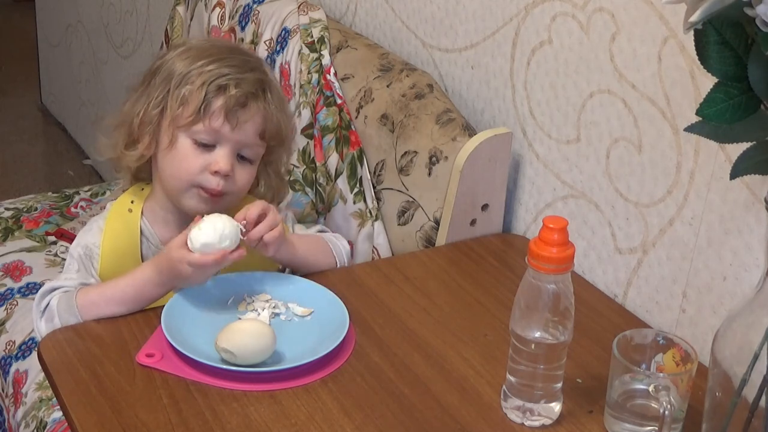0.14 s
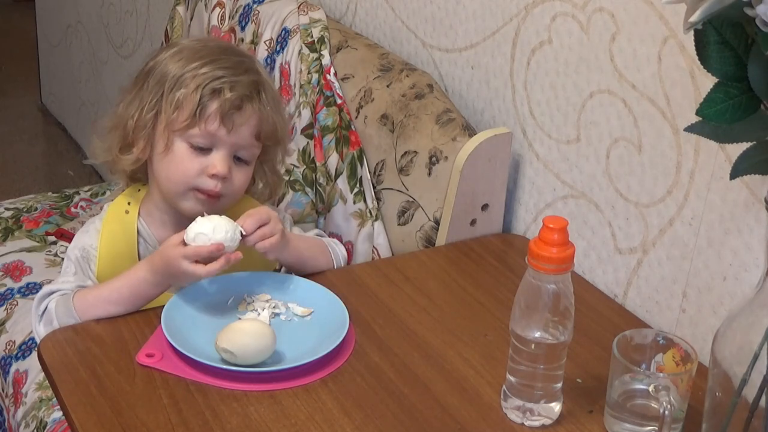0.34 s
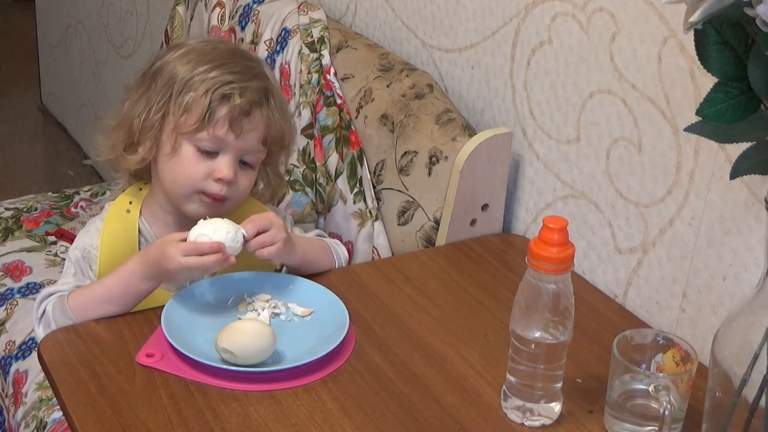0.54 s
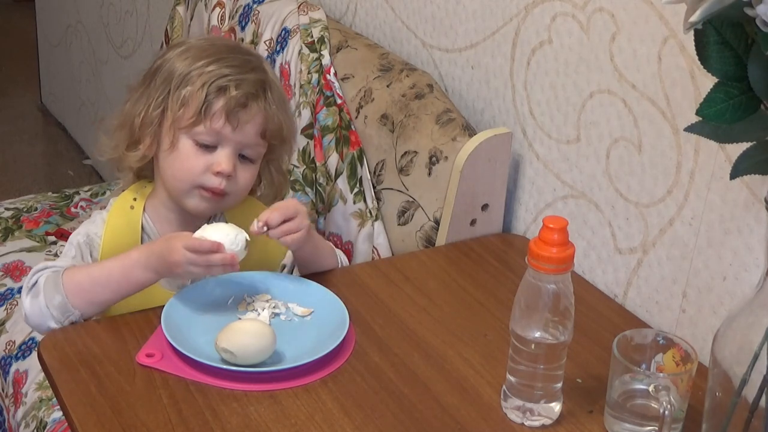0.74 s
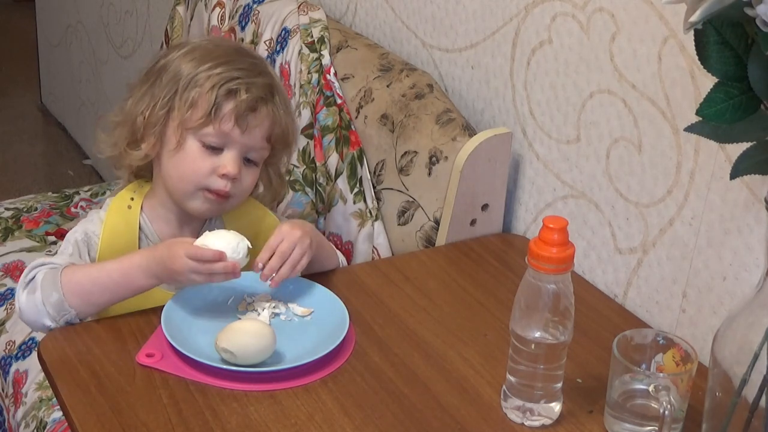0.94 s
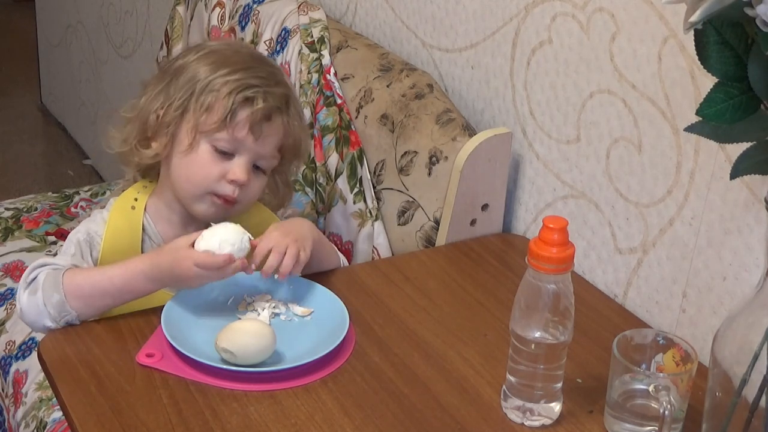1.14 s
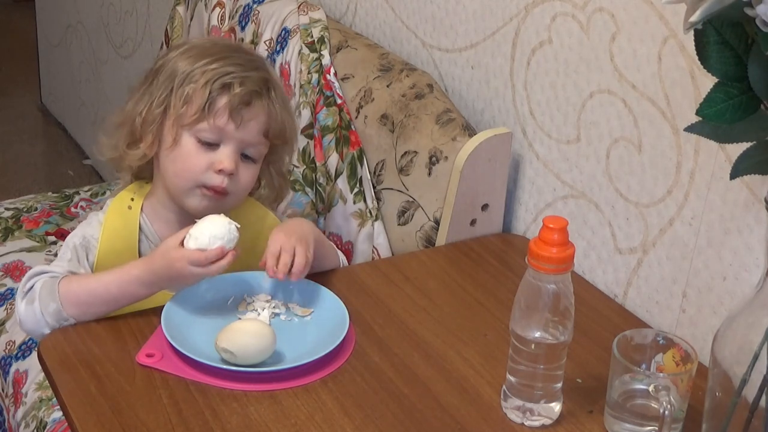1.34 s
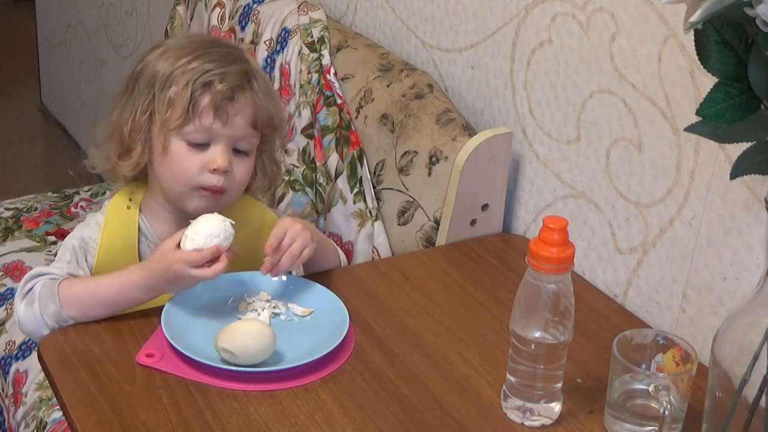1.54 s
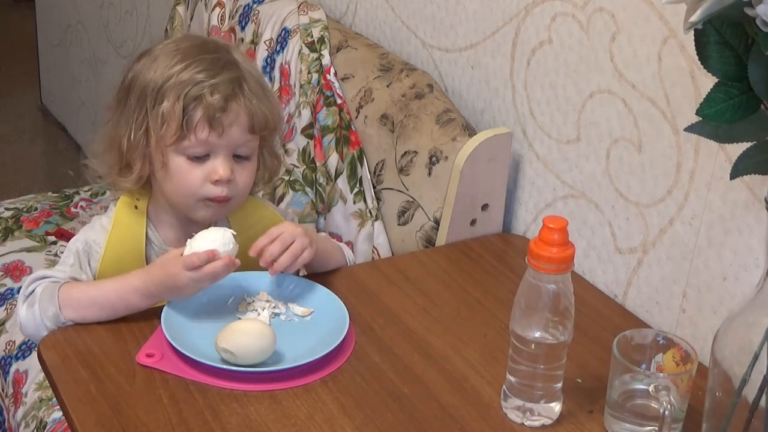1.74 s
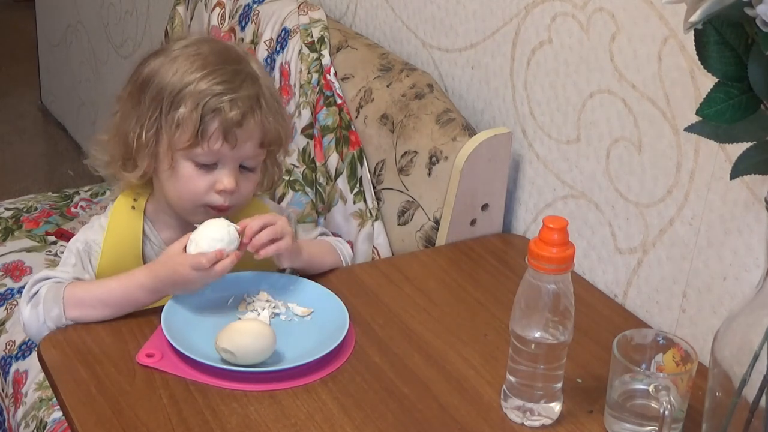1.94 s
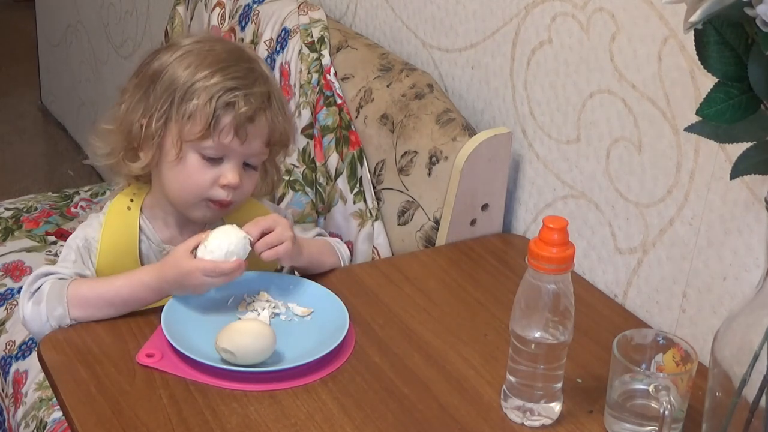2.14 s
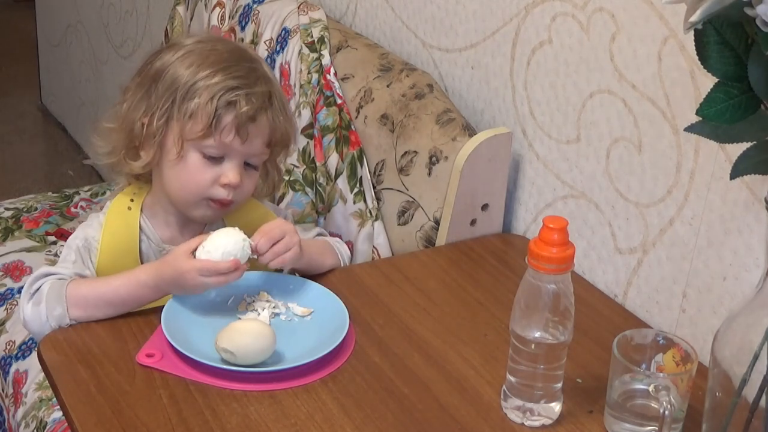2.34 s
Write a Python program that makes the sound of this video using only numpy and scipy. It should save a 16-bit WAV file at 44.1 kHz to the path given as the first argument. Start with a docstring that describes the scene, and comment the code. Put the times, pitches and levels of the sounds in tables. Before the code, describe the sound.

Close stereo pickup of egg peeling in a small kitchen: sharp gritty shell clinks on a plate within the first half second, then near quiet with soft hiss, a sleeve rustle, and late crackling snaps of shell.

```python
"""In a small kitchen a boiled egg is peeled over a china plate. Shell contacts are grainy noise bursts (clacks)
that also excite the modes of the plate and the table below as decaying sinusoids. Flakes snap as short high-
passed noise, and one pings in three high bands. Bumps are band noise; rubbing fingers and a sleeve are
swelling, grainy noise. Beneath lie a steady coloured hiss and a faint electric whine made of a fast train of
chirps."""
import sys
import numpy as np
from scipy import signal
from scipy.fft import rfft, irfft
from scipy.io import wavfile

SR = 44100
rng = np.random.default_rng(int(sys.argv[2]) if len(sys.argv) > 2 else 0)


def pcm_store(signal):
    """Save signal as 16-bit PCM."""
    levels = np.round(np.clip(np.atleast_2d(signal), -1, 1) * 32767)
    wavfile.write(sys.argv[1], SR, levels.astype(np.int16).T)


N = 105840
T = np.arange(N) / SR
FREQS = np.maximum(np.arange(N // 2 + 1) * SR / N, 1)  # Hz, kept above zero for logarithms


def undb(db):
    """Level to amplitude: 20 dB is a factor of ten."""
    return 10 ** (np.asarray(db) / 20)


def unit(x):
    """Normalisation: scale to an rms of 1."""
    return x / np.sqrt(np.mean(x ** 2))


def at(points, hz):
    """Logarithmic pitch scale: interpolate (frequency [Hz], value) points along log frequency."""
    points_hz, values = np.array(points).T
    return np.interp(np.log(hz), np.log(points_hz), values)


# difference between the two microphones, for sounds at the table: (frequency [Hz], side gain [dB])
TABLE_SIDE = [(60, -14), (250, -19), (600, -21), (1200, -16), (2200, -12), (4500, -6.5), (9000, -8),
              (15000, -9)]


def noise(gain, side_table=TABLE_SIDE):
    """Partial coherence: shaped stereo noise of rms 1 from a shared mid and an opposed side signal."""
    mid, side = rfft(rng.standard_normal((2, N)))
    side = side * undb(at(side_table, FREQS))
    left_right = np.array([mid + side, mid - side])
    return unit(irfft(left_right * gain, N))


def fade(start, t60, attack):
    """Exponential decay: a linear attack [s], then a fall of 60 dB in each t60 [s]."""
    age = T - start
    decay = undb(-60 * np.maximum(age - attack, 0) / t60)
    return np.clip(age / attack, 0, 1) * decay


def walk(rate):
    """Random modulation: normal random values, rate per second, joined by straight lines."""
    return np.interp(T * rate, np.arange(4096), rng.standard_normal(4096))


ROOM_T60_S, ROOM_DELAY_S = 0.14, 0.0007


def room(x, wet_db):
    """Reverberation: convolve with decaying noise for the dense reflections of table and walls."""
    tail = noise(1) * fade(ROOM_DELAY_S, ROOM_T60_S, ROOM_DELAY_S)
    tail = tail / np.sqrt(np.sum(tail ** 2) / 2)  # mean energy of 1 per channel
    reflections = signal.fftconvolve(x * np.ones((2, 1)), tail, axes=1)[:, :N]
    return x + undb(wet_db) * reflections


# shell on the plate: (time [s], clack level [dB], ring level [dB], clack tilt [dB/octave],
# ring tilt [dB/octave], extra level of the main mode [dB], contact length [s])
CONTACTS = [(0.0063, -49, -49, 3.5, 1, -12, 0.014), (0.051, -49, -45, 1.5, 0, 3.5, 0.0024),
            (0.129, -56.5, -61.5, 2.5, 3.5, -2, 0.0084), (0.2206, -21, -20.5, 0.63, -2.5, -14.5, 0.00226),
            (0.2326, -34.5, -25, -1.5, 4, -8, .003), (0.303, -42.5, -44, 4, 2.5, -14, 0.0084),
            (0.425, -28, -29.5, 1.5, -3, -26, 0.0044), (0.4318, -47, -25.5, 12, 2.5, 1.5, 0.001)]
# colour of a clack: (frequency [Hz], relative spectral density [dB per Hz])
CLACK_COLOUR = [(60, -47), (150, -34), (300, -41.5), (430, -21), (560, -10), (850, 0), (1050, -4),
                (1500, 4.5), (2000, 2.5), (2800, -2), (4000, -4.5), (5400, -2), (6200, -7.5), (7100, 0),
                (9500, -9.5), (10500, -5.5), (12500, -16), (13600, -10), (14400, -5), (16000, -11.5)]
# how long a clack hangs in the room: (frequency [Hz], t60 [s])
CLACK_T60 = [(300, 0.4), (800, 0.23), (2000, 0.14), (5500, 0.19), (14000, 0.23)]
CRACK_DB, CRACK_T60_S = -2, 0.096  # relative to the wash
CLACK_GRAIN_DB, CLACK_GRAIN_PER_S = 2.5, 900


def clacks():
    """Impact with frequency-dependent decay: a short crack and a gritty wash, longest in the lows."""
    centres = np.log([hz for hz, _ in CLACK_T60])
    # overlapping bands that sum to one, each with its own decay
    shares = [np.interp(np.log(FREQS), centres, row) for row in np.eye(len(centres))]
    out = 0
    for start, db, _, tilt_db, _, _, contact in CONTACTS:
        grit = rfft(noise(1) * undb(CLACK_GRAIN_DB * walk(CLACK_GRAIN_PER_S)))
        colour = undb(at(CLACK_COLOUR, FREQS) + tilt_db * np.log2(FREQS))
        burst = rfft(unit(irfft(grit * colour, N)))
        crack = undb(CRACK_DB) * fade(start, CRACK_T60_S, contact)
        for share, (_, t60) in zip(shares, CLACK_T60):
            envelope = (fade(start, t60, contact) + crack) / (1 + undb(CRACK_DB))
            out = out + undb(db) * irfft(burst * share, N) * envelope
    return out


# early echoes from wall and table: (delay [s], level [dB])
ECHOES = [(.00323, -12.5), (.0069, -7.5)]


def echoed(x):
    """Comb filtering: the first echoes interfere with the direct sound and ripple its spectrum."""
    comb = 1 + sum(undb(db) * np.exp(-2j * np.pi * FREQS * delay) for delay, db in ECHOES)
    return irfft(rfft(x) * comb, N)


# natural frequencies: the plate's, with those of the table and body below it at 1200-3400 Hz and 5450 Hz:
# (frequency [Hz])
PLATE_HZ = [1200, 1480, 1645, 1860, 2850, 3400, 4015, 4110, 5450, 6925, 7015, 7210, 8260, 10340, 10445,
            10630, 14300, 15370]
# the same modes in the same order: (level [dB], t60 [s])
PLATE_MODES = [(-17, 0.16), (-11, 0.055), (-18.5, 0.12), (-14, 0.1), (-7, 0.03), (-12.5, 0.063), (-5, .14),
               (-22.5, 0.2), (-21, 0.084), (-4.5, 0.12), (-14.5, .13), (-19.5, 0.19), (-9, 0.095),
               (-3.5, .12), (-7, 0.11), (-18, 0.18), (-9.5, 0.19), (-10, 0.091)]
MAIN_MODE_HZ = 4015  # how hard it rings depends on where the plate is struck
RING_BLUR, RING_BLUR_PER_S = .8, 150  # random part relative to the steady tone; its rate
RING_S = 0.25  # each ring is computed for this long


def plate():
    """Modal vibration: contacts set the china ringing; reflections blur each mode and make it flutter."""
    out = np.zeros((2, N))
    for start, _, db, _, tilt_db, main_db, contact in CONTACTS:
        first = int(start * SR)
        near = slice(first, first + int(RING_S * SR))
        age = T[near] - start
        for hz, (mode_db, t60) in zip(PLATE_HZ, PLATE_MODES):
            # complex random paths: one blurs both channels, one sets them apart
            steps = rng.standard_normal((2, 256, 2)) @ np.array([1, 1j]) / np.sqrt(2)
            blur, side = (np.interp(age * RING_BLUR_PER_S, np.arange(len(s)), s) for s in steps)
            steady = np.exp(2j * np.pi * rng.random())
            mid = (steady + RING_BLUR * blur) / np.hypot(1, RING_BLUR)
            left_right = mid + undb(at(TABLE_SIDE, hz)) * side * np.array([[1], [-1]])
            level_db = db + mode_db + tilt_db * np.log2(hz / MAIN_MODE_HZ)
            level_db += main_db * (hz == MAIN_MODE_HZ)
            tone = np.imag(left_right * np.exp(2j * np.pi * hz * age))
            out[:, near] += undb(level_db) * fade(start, t60, contact)[near] * tone
    return out


FLAKE_S = 0.4718
# modes of the landing flake: (frequency [Hz], half width at half amplitude [Hz], level [dB], t60 [s])
FLAKE_MODES = [(11600, 550, -29, 0.015), (13100, 100, -31, 0.058), (14900, 420, -33, 0.024)]


def flake():
    """Small-body resonance: a tiny piece of shell lands and rings very high in narrow noise bands."""
    out = 0
    for hz, width, db, t60 in FLAKE_MODES:
        band = noise(1 / (1 + ((FREQS - hz) / width) ** 2))
        out = out + undb(db) * band * fade(FLAKE_S, t60, 0.00042)
    return out


# flakes of shell snapping: (time [s], level [dB], lower edge [Hz])
SNAPS = [(0.4718, -28, 11000), (0.6168, -47, 11500), (0.6224, -37.5, 11100), (0.639, -39.5, 12300),
         (0.6475, -53, 12100), (1.4091, -42, 10700), (2.2833, -37.5, 7900), (2.2854, -37, 6860),
         (2.286, -40, 4500), (2.2931, -28.5, 8050), (2.2948, -36.5, 3920), (2.3160, -38, 3500)]
SNAP_T60_S, SNAP_ROOM_DB, SNAP_TILT_DB = 0.0033, -2.5, 4  # tilt per octave


def snaps():
    """Brittle fracture: a very short release of energy gives a high, broadband tick."""
    out = 0
    for start, db, edge_hz in SNAPS:
        high_pass = 1 / np.hypot(1, (edge_hz / FREQS) ** 6)
        colour = undb(SNAP_TILT_DB * np.log2(FREQS)) * high_pass
        out = out + undb(db) * noise(colour) * fade(start, SNAP_T60_S, 0.00037)
    return room(out, SNAP_ROOM_DB)


# soft bumps of fingers and egg: (time [s], level [dB], centre [Hz], t60 [s])
BUMPS = [(0.0119, -49.5, 2880, 0.14), (0.3066, -42.5, 5760, .04), (0.32, -46, 3350, 0.032),
         (1.3217, -62.5, 684, 0.057), (1.3692, -63, 1660, 0.017), (2.38, -53, 1560, 0.021)]
BUMP_WIDTH_OCT, BUMP_ROOM_DB = 0.16, -5  # half width at half amplitude; reflections


def bumps():
    """Damped resonance: each soft knock is a fading noise band around one centre."""
    out = 0
    for start, db, hz, t60 in BUMPS:
        octaves = np.log2(FREQS / hz)
        band = noise(1 / (1 + (octaves / BUMP_WIDTH_OCT) ** 2))
        out = out + undb(db) * band * fade(start, t60, 0.0012)
    return room(out, BUMP_ROOM_DB)


GRAIN_DB, GRAIN_PER_S = 1, 480


def stroke(start, length, db, colour):
    """Sliding friction: grainy noise that swells and dies away."""
    swell = np.sin(np.pi * np.clip((T - start) / length, 0, 1))
    grain = undb(db + GRAIN_DB * walk(GRAIN_PER_S))
    return swell * grain * noise(undb(at(colour, FREQS)))


# fingers rubbing on shell: (start [s], length [s], level [dB])
RUBS = [(0.347, 0.11, -57), (0.52, 0.29, -65.5), (2.023, 0.1, -67)]
# colour of the rubbing: (frequency [Hz], relative spectral density [dB per Hz])
RUB_COLOUR = [(100, -37), (300, -23), (1000, -5), (2400, -4.5), (3500, -2.5), (5300, -3), (7000, -5.5),
              (10000, -3.5), (16000, -17)]


def rubs():
    """Sliding friction: fingers rub on the shell in separate strokes."""
    return sum(stroke(start, length, db, RUB_COLOUR) for start, length, db in RUBS)


# colour of the sleeve: (frequency [Hz], relative spectral density [dB per Hz])
SLEEVE_COLOUR = [(100, -32), (300, -28), (900, -17), (1400, -6.5), (2100, -4), (3500, -4.5), (5000, -6),
                 (7500, -2.5), (11000, -2.5), (16000, -3)]
SLEEVE_S, SLEEVE_LENGTH_S, SLEEVE_DB = 0.8067, .14, -51.5


def sleeve():
    """Sliding friction: the sleeve brushes along once as the hand goes down to the plate."""
    return stroke(SLEEVE_S, SLEEVE_LENGTH_S, SLEEVE_DB, SLEEVE_COLOUR)


# pitch of the upper chirps: (time [s], frequency [Hz])
WHINE_PITCH = [(0, 9520), (1.1, 9600), (1.3, 9220), (1.68, 9100), (1.76, 9520), (1.82, 9560), (1.83, 8200),
               (2.4, 8200)]
WHINE_PULSE_HZ, WHINE_WIDTH = 70, 0.1  # width: Gaussian spread as a fraction of the pulse period
WHINE_DB, LOW_WHINE_HZ, LOW_WHINE_DB = -73.5, 7860, -78
CHIRP_HZ_PER_S = 70000


def whine():
    """Pulsed frequency modulation: an even train of chirps, each led by a weaker, lower one."""
    out = 0
    pitch = np.interp(T, *np.array(WHINE_PITCH).T)
    # lead: how far the pulse is advanced, as a fraction of the period
    for hz, db, lead in [(pitch, WHINE_DB, .3), (LOW_WHINE_HZ, LOW_WHINE_DB, .42)]:
        cycle = (T * WHINE_PULSE_HZ + lead) % 1 - .5
        age = cycle / WHINE_PULSE_HZ
        phase = 2 * np.pi * (hz + CHIRP_HZ_PER_S * age / 2) * age
        chirp = np.sin(phase + .5 * walk(100))
        pulse = np.exp(-.5 * (cycle / WHINE_WIDTH) ** 2)
        out = out + undb(db + 1.1 * walk(31)) * unit(pulse * chirp)
    return out


# colour of the steady hiss: (frequency [Hz], relative spectral density [dB per Hz])
HISS_COLOUR = [(15, -66), (25, -44), (378, -15), (421, -6.5), (469, -8.5), (722, -6), (895, -5.5),
               (1110, -6.5), (3930, -3.5), (4260, -4.5), (5430, -7), (9300, -6), (11200, -11), (13500, -11),
               (15500, -13.5)]
# its narrow resonances: (frequency [Hz], half width at half amplitude [Hz], level [dB])
HISS_PEAKS = [(2725, 70, -80.5), (3000, 150, -78.5), (3754, 66, -78), (4335, 130, -75), (13600, 370, -80.5)]
# difference between the two microphones, for the hiss: (frequency [Hz], side gain [dB])
HISS_SIDE = [(60, -8), (110, -16), (200, -16), (380, -14.5), (700, -8), (1290, -1), (2380, -1),
             (4400, -3.5), (8120, -1), (15000, -5.5)]
HISS_DB, PEAK_WAVER_DB = -63.5, 1.2


def hiss():
    """Stationary noise: a quiet, even background with a few narrow resonances that waver."""
    out = undb(HISS_DB) * noise(undb(at(HISS_COLOUR, FREQS)), HISS_SIDE)
    for hz, width, db in HISS_PEAKS:
        band = noise(1 / (1 + ((FREQS - hz) / width) ** 2), HISS_SIDE)
        out = out + undb(db + PEAK_WAVER_DB * walk(9.3)) * band
    return out


BASS_CUT_HZ, BED_TOP_HZ = 320, 15850


def scene():
    """Superposition: all sources add; the bed is low-passed at BED_TOP_HZ, the snaps are added after it."""
    bass_cut = signal.butter(2, BASS_CUT_HZ, "high", fs=SR, output="sos")
    knocks = signal.sosfilt(bass_cut, plate() + bumps())
    bed = echoed(clacks()) + knocks + flake() + rubs() + sleeve() + whine() + hiss()
    top_cut = 1 / np.hypot(1, (FREQS / BED_TOP_HZ) ** 80)
    return irfft(rfft(bed) * top_cut, N) + snaps()


TOP_HZ = 16950


def record(dry):
    """Band limitation: the recorder cuts the top steeply with an elliptic low-pass."""
    low_pass = signal.ellip(10, .2, 70, TOP_HZ, fs=SR, output="sos")  # 0.2 dB ripple, 70 dB stopband
    return signal.sosfilt(low_pass, dry)


dry = scene()
out = record(dry)
pcm_store(out)
```